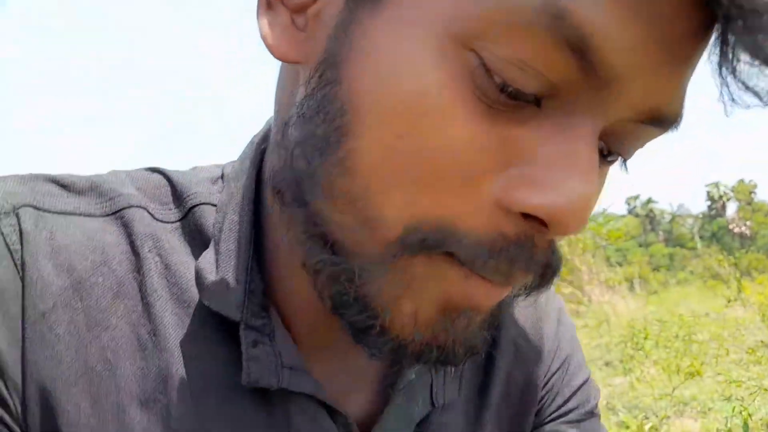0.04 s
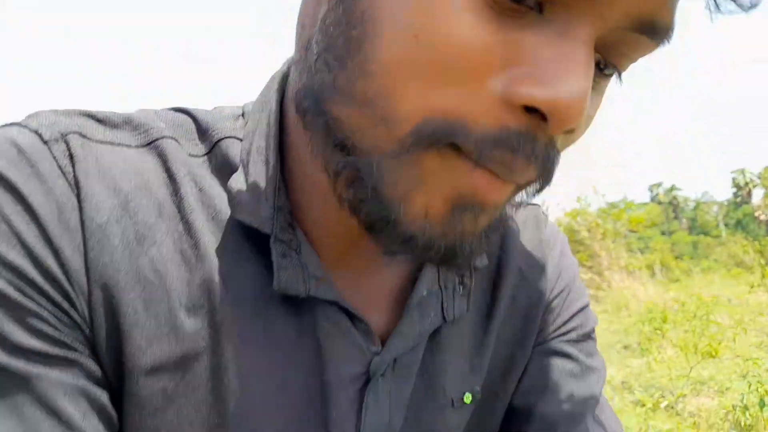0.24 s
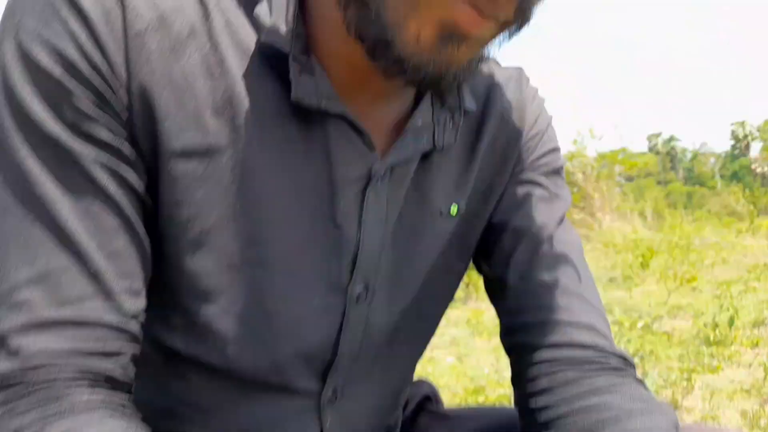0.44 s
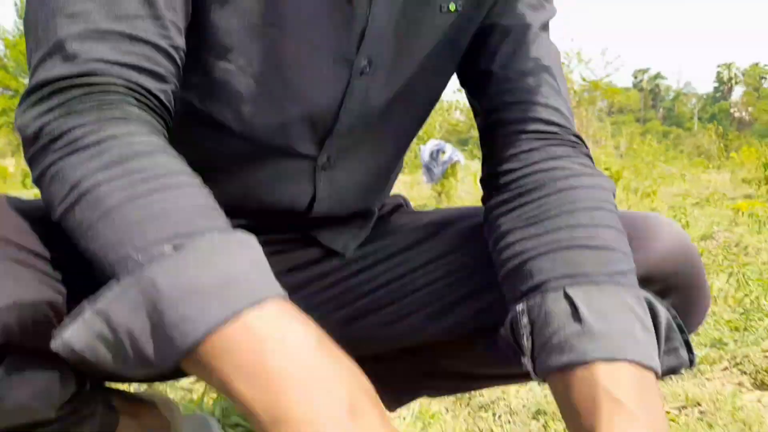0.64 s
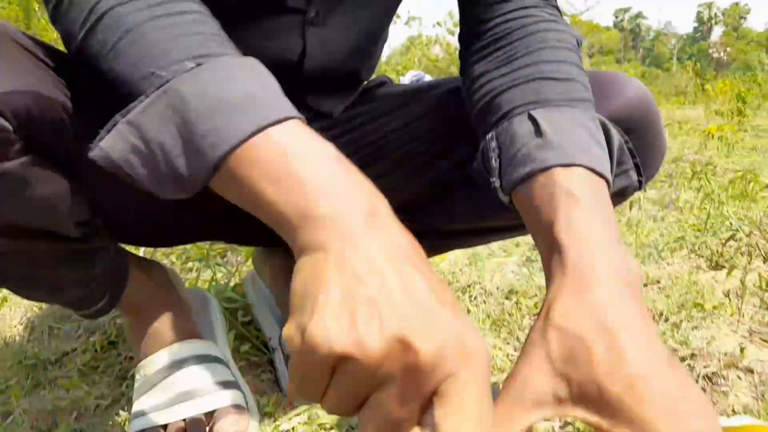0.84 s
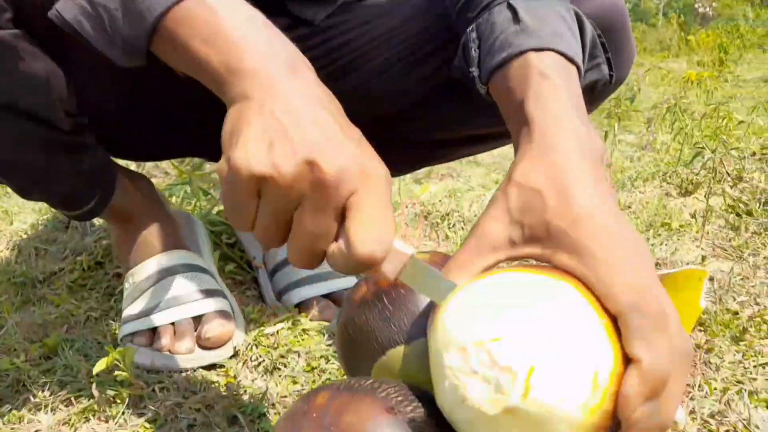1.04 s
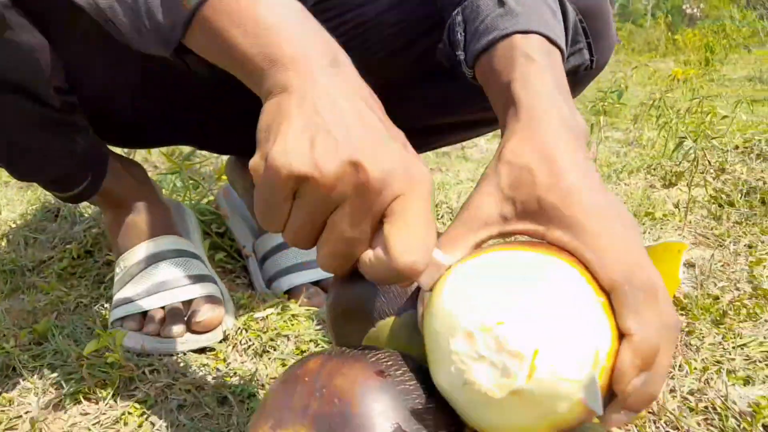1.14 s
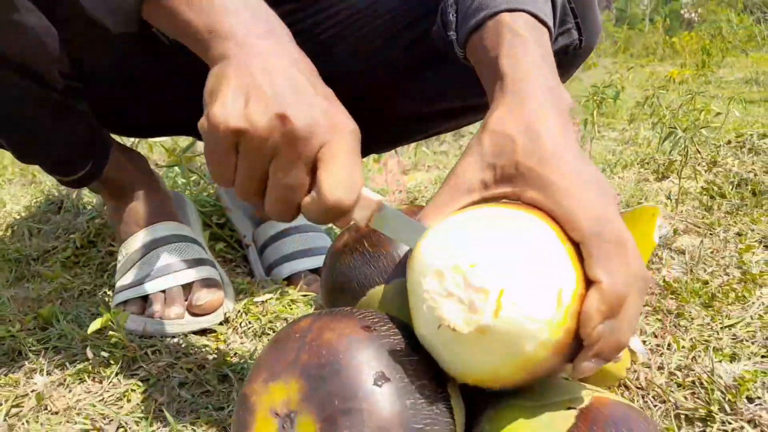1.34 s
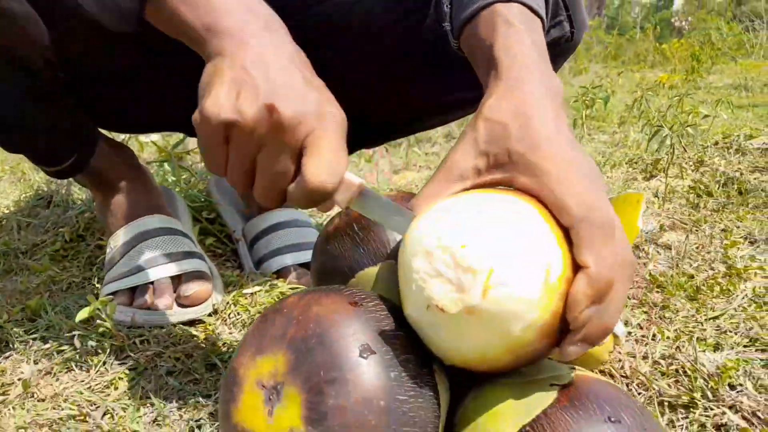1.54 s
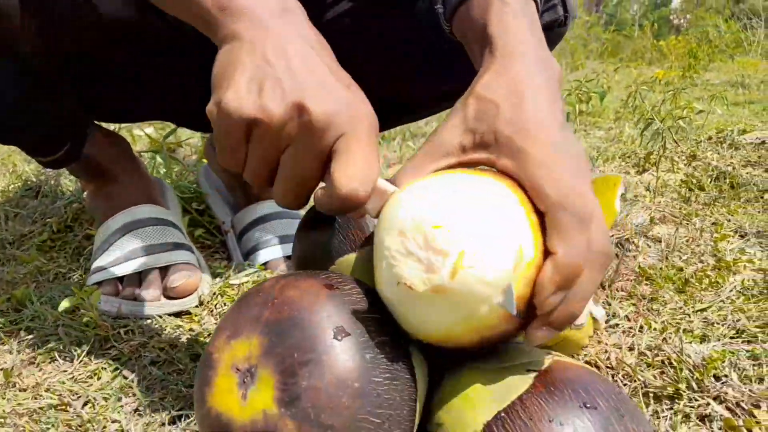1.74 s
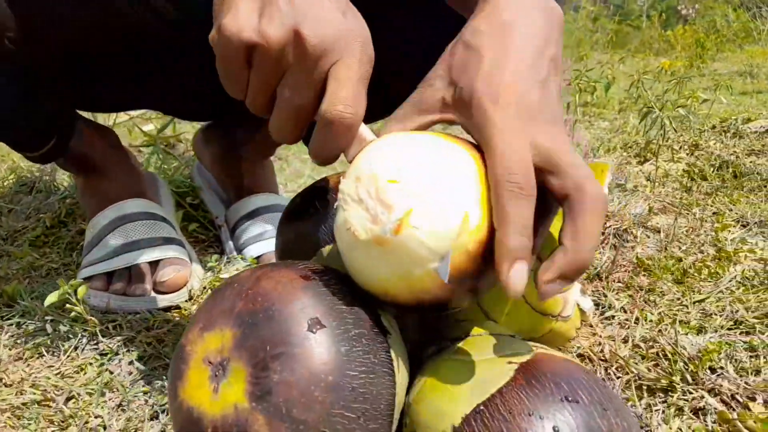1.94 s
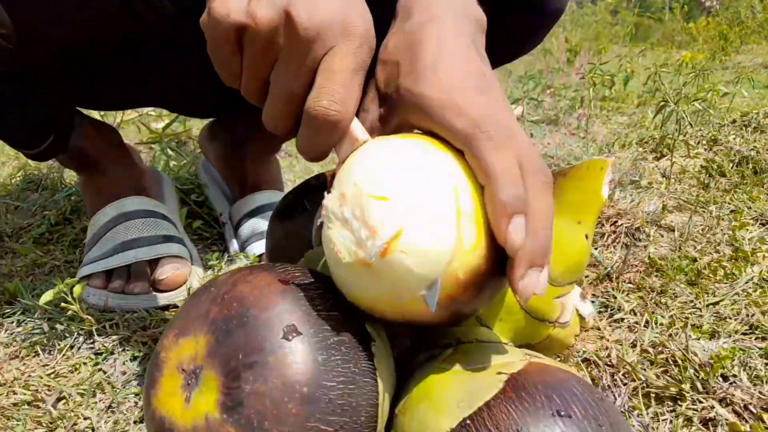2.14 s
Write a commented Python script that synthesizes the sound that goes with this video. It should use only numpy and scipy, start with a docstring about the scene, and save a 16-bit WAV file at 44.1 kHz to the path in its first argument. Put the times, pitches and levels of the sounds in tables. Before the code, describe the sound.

A small knife saws through fibrous palm fruit, close and dry, outdoors. Faint rasps start near 0.05 s, with a soft thump and dry tick at 0.2. From 0.4 to 1.7 s, fast uneven crunchy strokes tear fibres, with sharp snaps around 0.6, 0.95, 1.2 and 1.5. A quieter squeaky slide follows at 1.75-1.95, then a fainter one at 2.05-2.2, over light low breeze and faint hiss.

```python
"""A small knife saws through the fibrous flesh of a palm fruit in a field, over a light breeze and soft thumps.
Quick strokes come first: clumped grains of noise rasp like tearing fibres, coloured by the fruit's modes.
Among them thick fibres snap, each a short chord of decaying sines with a crumbly noise tail.
At the end the blade slides and twists twice, more gently, with narrow squeaks.
The two microphone ports of a hand-held phone hear it at different levels and phases."""
import sys
import numpy as np
from scipy import signal
from scipy.fft import rfft, irfft
from scipy.io import wavfile

SR = 44100
rng = np.random.default_rng(int(sys.argv[2]) if len(sys.argv) > 2 else 0)


def digitize_waveform(pressure):
    """Quantize a signal to 16-bit integers and store it at the path in sys.argv[1].

    Rows of a 2-D input are taken as channels; values are limited to [-1, 1].
    """
    field = np.atleast_2d(pressure).T
    bounded = np.clip(field, -1, 1)
    quanta = np.round(bounded * 32767).astype(np.int16)
    wavfile.write(sys.argv[1], SR, quanta)


N = 97020

# Modes the fruit rings with, before detuning: pitch_hz, relative level_db, shortest t60_s
FRUIT_MODES = [(650, -6, .02), (950, -6, .016), (1580, -2, .013), (2050, -1, .012), (2400, 1, .011),
               (2990, 2, .008), (3600, 2, .006), (4500, 3, .008), (5500, 1, .005), (6500, 0, .006)]


def amp(db):
    """Decibels to linear gain."""
    return 10 ** (np.asarray(db) / 20)


def rms_one(x):
    """Scale to an overall RMS of 1."""
    return x / np.sqrt(np.mean(x ** 2) + 1e-20)


def decay_per_sample(t60_s):
    """Factor that makes a sound fall 60 dB in t60_s."""
    return amp(-60 / (t60_s * SR))


def at_hz(points):
    """A table of (Hz, value) read at every frequency bin, along a log axis."""
    hz, value = np.transpose(points)
    bins_hz = np.arange(N // 2 + 1) * SR / N
    return np.interp(np.log(bins_hz + 1), np.log(hz + 1), value)


def colour(x, spectrum):
    """Filter by a drawn spectrum in dB."""
    return irfft(rfft(x) * amp(at_hz(spectrum)), N)


def band(x, low_hz, high_hz):
    """Keep one band of frequencies."""
    return signal.sosfilt(signal.butter(3, [low_hz, high_hz], "band", fs=SR, output="sos"), x)


def low_pass(x, hz):
    """Gentle second-order cut of the treble."""
    return signal.sosfilt(signal.butter(2, hz, fs=SR, output="sos"), x)


def high_pass(x, hz):
    """Gentle second-order cut of the bass."""
    return signal.sosfilt(signal.butter(2, hz, "high", fs=SR, output="sos"), x)


def drift(rate_hz):
    """Slow random wander of RMS 1, from noise smoothed by two equal poles."""
    r = np.exp(-2 * np.pi * rate_hz / SR)
    wander = signal.lfilter([1], [1, -2 * r, r * r], rng.standard_normal(N + SR))
    return rms_one(wander[SR:])  # the first second lets the filter settle


def ring(clicks, hz, t60_s):
    """Two-pole resonator: a unit click starts a decaying sine of initial height 1."""
    r, w = decay_per_sample(t60_s), 2 * np.pi * hz / SR
    return signal.lfilter([0, np.sin(w)], [1, -2 * r * np.cos(w), r * r], clicks + 1e-18)


def pair(shared, own, alike):
    """Two channels that share a fraction of their power."""
    return np.sqrt(alike) * shared + np.sqrt(1 - alike) * own


def follow(strokes):
    """Gain (zero between strokes) and the further columns of a list of strokes, sample by sample."""
    edge_s = .003  # a stroke fades in and out this fast
    t = np.arange(N) / SR
    on = 0
    for points in strokes:
        inside_s = np.minimum(t - points[0][0], points[-1][0] - t)
        on = on + np.clip(inside_s / edge_s + 1, 0, 1)
    rows = np.concatenate(strokes)
    columns = [np.interp(t, rows[:, 0], column) for column in rows[:, 1:].T]
    return np.minimum(on, 1), columns


def around(x, centre_hz, below_oct, above_oct, count):
    """Bands weighted about a moving centre, 6 dB down at below_oct and above_oct; summed gain power is 1."""
    patch_db, patches_hz = 2.5, 45  # each band flares on its own
    edges = np.geomspace(420, 7400, count + 1)
    band_hz = np.sqrt(edges[1:] * edges[:-1])[:, None]
    off_oct = np.log2(band_hz / centre_hz)
    width_oct = np.where(off_oct < 0, below_oct, above_oct)
    gains = amp(-6 * (off_oct / width_oct) ** 2) + 1e-9
    gains = gains / np.sqrt(np.sum(gains ** 2, axis=0))
    out = 0
    for gain, low_hz, high_hz in zip(gains, edges, edges[1:]):
        patchy = band(x, low_hz, high_hz) * amp(patch_db * drift(patches_hz))
        out = out + gain * rms_one(patchy)
    return out


def lead():
    """Phase lead of the left port by frequency; the right is left as it is."""
    # pitch_hz, lead_radians of the left port
    left_lead = [(0, 0), (600, -.7), (2500, -1.5), (3200, .2), (4500, -1.8), (16000, -2)]
    hz, radians = np.transpose(left_lead)
    bins_rad = np.interp(np.arange(N // 2 + 1) * SR / N, hz, radians)
    return np.exp(1j * np.array([[1], [0]]) * bins_rad)


def ports(x):
    """The two microphone ports differ in level and phase by frequency."""
    # pitch_hz, left_minus_right_db
    port_balance = [(60, -4.5), (110, -6.5), (200, -5), (380, -3.5), (700, -3.5), (1290, -6.5), (2380, -1),
                    (4400, -18.5), (8120, -3.5), (15000, 4)]
    side = np.array([[.5], [-.5]])  # half of the difference to each side
    spectrum = rfft(x * np.ones((2, 1)))
    return irfft(spectrum * amp(side * at_hz(port_balance)) * lead(), N)


def air():
    """Coloured noise: lumpy low wind on the ports over the faint hiss of the field."""
    # Colour of breeze and field: pitch_hz, relative level_db per Hz
    air_colour = [(18, -36), (30, -5), (221, 4), (600, -2.5), (913, -15.5), (1160, -27), (3580, -20),
                  (4530, -22), (4910, -15), (6550, -19), (8520, -25), (14400, -27), (16000, -37)]
    # Strength of the low wind before gusts and ports: time_s, level_db
    breeze = [(0.0, -58.5), (0.29, -50.5), (0.43, -54), (0.62, -51.5), (1.06, -51), (1.37, -50.5),
              (1.43, -49), (1.93, -54), (2.2, -53.5)]
    gust_db, gusts_hz, hiss_db = 1.5, 14, -53.5
    noise = rng.standard_normal((3, N))
    field = colour(pair(noise[0], noise[1:], alike=.5), air_colour)
    field = field / np.std(band(field, 40, 440))
    s, db = np.transpose(breeze)
    wind_db = np.interp(np.arange(N) / SR, s, db)
    gusts = amp(wind_db + gust_db * drift(gusts_hz))
    wind = gusts * low_pass(field, 500)
    hiss = amp(hiss_db) * high_pass(field, 600)
    return ports(wind + hiss)


def thumps():
    """Soft pushes of hand and fruit as short sine bursts, louder on the right."""
    # middle_s, level_db before panning, pitch_hz, half_length in cycles (to 1/e)
    pushes = [(0.206, -23, 220, 0.5), (.347, -34, 177, 1.27), (1.13, -39, 317, 1.5),
              (0.979, -37.5, 115, 0.55), (1.09, -38, 148, 0.71), (1.179, -41.5, 62.3, 0.39),
              (1.458, -34, 80, 0.32), (1.701, -25.5, 380, 0.34), (1.713, -31, 80, 0.23)]
    out = np.zeros((2, N))
    for middle_s, level_db, hz, half_length in pushes:
        cycles = (np.arange(N) / SR - middle_s) * hz
        swell = np.exp(-(cycles / half_length) ** 2)
        out += amp(level_db) * np.sin(2 * np.pi * cycles) * swell * amp([[-4], [3]])
    return out


def tap():
    """One dry tick at the right port: a click into a heavily damped resonator."""
    # start_s, level_db, pitch_hz, t60_s
    tick = (.2048, 1, 3500, .0016)
    s, level_db, hz, t60_s = tick
    click = 1. * (np.arange(N) == int(s * SR))
    out = np.zeros((2, N))
    out[1] = amp(level_db) * ring(click, hz, t60_s)
    return out


def snaps():
    """A crack rings the fruit's modes, louder and longer near its centre; a crumbly tail follows."""
    # Thick fibres that snap: start_s, level_db, centre_hz, treble_db (relative), centre_lift_db
    cracks = [(0.1, -34.5, 990, -24.5, 8), (0.263, -21.5, 1410, -3.5, 16), (0.282, -29, 1760, -25, 15),
              (0.314, -25.5, 5640, -8, 11), (0.3281, -16, 1350, -12.5, 9), (0.376, -23, 985, -9, 6.5),
              (0.457, -17, 2010, -10, 3.5), (0.521, -13.5, 6470, -36, 12), (0.579, -19, 970, -3, 0),
              (0.5831, -13.5, 2166, -13.5, 10), (0.6094, -6.5, 1480, -14, 0.5), (0.632, -27, 695, -35, 16),
              (0.635, -24.5, 1680, -25, 29), (0.65, -33.5, 640, -32, 12), (0.671, -26, 2020, -20, -4),
              (0.719, -22.5, 5430, -15, 22), (0.854, -16, 4500, -22, -12), (0.881, -21.5, 1190, -23, 0),
              (0.887, -16, 2110, -16, 12), (0.936, -23.5, 2230, -18, -3), (0.9434, -6.5, 1663, -22.5, 3),
              (0.974, -27.5, 720, -14, 6), (1.016, -17, 4960, -5, 13), (1.022, -14.5, 2200, -26, 14.5),
              (1.15, -16.5, 4760, -16, 6.5), (1.16, -12, 1730, -10.5, 5.5), (1.167, -19, 1850, -25, 4),
              (1.176, -22.5, 4500, -5.5, 7.5), (1.198, -23, 5230, -27, 13), (1.202, -21, 1630, -8.5, -8),
              (1.2152, -4.5, 2515, -29, 2.5), (1.23, -18, 1640, -37, 4), (1.24, -22.5, 4630, -14.5, -4),
              (1.405, -20, 5600, -25, 19), (1.43, -21, 4970, -18, 24), (1.452, -16.5, 3920, -22, 2),
              (1.4956, -6, 3220, -25.5, -1), (1.531, -23, 1810, -18, 19), (1.643, -23, 2860, -12, -2),
              (1.7, -16, 4180, -29, 2), (1.7047, -15.5, 3600, -21, 10), (1.733, -27.5, 2400, -28, 3)]
    # Brief treble tick of a snap: pitch_hz, relative level_db, shortest t60_s
    spark = [(9870, 0, .003), (11500, -4, .003), (13700, 0, .003)]
    # Where the modes sound: pitch_hz, left_minus_right_db
    mode_sides = [(700, -2.5), (2500, -8.5), (4500, -8), (9000, -6)]
    delay_s = .000872  # short fixed delay from start_s to the crack
    below_oct, above_oct = 1.15, 1.7  # modes fall 6 dB this far under and over the centre
    peak_oct, linger = .24, .6  # width of the favoured modes; how much longer they ring
    detune, mode_spread_db = .03, 2  # each snap holds the fruit a little differently
    spark_db, after_db, after_t60_s = 14, -11.5, .017

    t = np.arange(2000) / SR
    hz, level_db, t60_s = np.transpose(FRUIT_MODES + spark)[:, :, None]
    index = np.arange(len(hz))[:, None]
    is_body, sign = index < len(FRUIT_MODES), (-1) ** index
    side_hz, side_db = np.transpose(mode_sides)
    pan_db = np.interp(np.log(hz), np.log(side_hz), side_db)

    out, tail = np.zeros((2, N + SR)), np.zeros((2, N))
    for s, snap_db, centre_hz, treble_db, lift_db in cracks:
        level_draw, pitch_draw, pan_draw = rng.standard_normal((3, len(hz), 1))
        off_oct = np.log2(hz / centre_hz)
        near = np.exp(-(off_oct / peak_oct) ** 2)
        width_oct = np.where(off_oct < 0, below_oct, above_oct)
        body_db = lift_db * near - 6 * (off_oct / width_oct) ** 2
        tilt_db = np.where(is_body, body_db, treble_db + spark_db)
        # modes near the centre are pulled onto it
        tuned_hz = hz * (1 + detune * pitch_draw) * 2 ** (-off_oct * near)
        decay_db = -60 * t / (t60_s * (1 + linger * near))
        heights = amp(level_db + tilt_db + mode_spread_db * level_draw + decay_db)
        modes = sign * heights * np.sin(2 * np.pi * tuned_hz * t)
        modes = amp(snap_db) * modes / np.max(np.abs(np.sum(modes, axis=0)))
        half_pan = amp((pan_db + mode_spread_db * pan_draw) / 2)
        at = int((s + delay_s) * SR)
        out[:, at:at + len(t)] += [np.sum(modes * half_pan, axis=0), np.sum(modes / half_pan, axis=0)]
        tail[:, at] = amp(snap_db + after_db + np.array([-4, 3]))  # louder on the right

    crumbs = rms_one(band(rng.standard_normal((2, N)), 644, 6150))
    tail_gain = signal.lfilter([1], [1, -decay_per_sample(after_t60_s)], tail + 1e-18)
    out = high_pass(out[:, :N] + crumbs * tail_gain, 480)
    return irfft(rfft(out) * lead(), N)


def fibre_grains():
    """Three streams of tearing fibre: random clicks on hiss, clumped and burst together."""
    fibres_per_s, fibre_spread_db, hiss_db = 4000, 4.5, -1
    clump_db, clumps_hz = 2, 220
    pops_per_s, pop_db, pop_t60_s = 130, 5.5, .003  # coarser fibres give way in short bursts
    sizes = amp(fibre_spread_db * np.minimum(rng.exponential(1, (3, N)), 5))
    sizes = sizes * rng.choice([-1, 1], (3, N))
    clicks = rms_one(sizes * (rng.random((3, N)) < fibres_per_s / SR))
    grains = clicks + amp(hiss_db) * rng.standard_normal((3, N))
    pops = (rng.random(N) < pops_per_s / SR) * amp(pop_db) * rng.random(N)
    bursts = 1 + signal.lfilter([1], [1, -decay_per_sample(pop_t60_s)], pops + 1e-18)
    return grains * bursts * amp(clump_db * drift(clumps_hz))


def rasp():
    """Fibre grains excite the fruit's modes; a moving body band, a treble band and a squeak follow the blade."""
    # Sawing strokes: time_s, body level_db, centre_hz, treble level_db (before drag and ports)
    saw_strokes = [
        [(0.043, -79, 2940, -86.5), (0.05, -46.5, 4670, -47), (0.078, -52, 4170, -57),
         (0.112, -54.5, 1850, -59)],
        [(0.225, -49.5, 4040, -50), (0.235, -37.5, 4300, -39), (0.255, -42.5, 4300, -50),
         (0.298, -45, 2930, -52)],
        [(0.308, -57, 4140, -59), (0.316, -55, 5250, -54), (0.345, -42.5, 2300, -52)],
        [(0.372, -58, 3010, -53), (0.382, -50, 2010, -51), (0.4, -54, 4970, -41)],
        [(0.411, -38, 3830, -50), (0.416, -35, 3370, -34), (0.435, -40.5, 3800, -39.5),
         (0.455, -38.5, 3420, -47), (0.483, -47.5, 3600, -51)],
        [(0.518, -47, 3500, -53), (0.522, -33, 6400, -34), (0.555, -25.5, 5700, -31),
         (0.566, -44.5, 3920, -46.5), (0.598, -37, 2130, -50)],
        [(0.62, -42, 1600, -59), (0.637, -52, 1320, -55), (0.65, -55, 1130, -65), (0.685, -50.5, 3280, -57)],
        [(0.708, -42.5, 4140, -58), (0.717, -54, 4760, -36), (0.721, -34, 4740, -30), (0.765, -34, 3200, -37),
         (0.78, -45, 3320, -39)],
        [(0.818, -53, 3780, -56), (0.829, -29, 4100, -32), (0.858, -24, 4670, -30.5), (0.869, -38.5, 3430, -46),
         (0.9, -43, 2790, -53)],
        [(0.95, -57, 2300, -52), (0.975, -52, 1920, -67), (0.995, -47.5, 3600, -45), (1.012, -46, 3830, -56)],
        [(1.014, -47, 3700, -35), (1.02, -34, 3340, -26.5), (1.042, -35.5, 3600, -36.5),
         (1.068, -43.5, 3740, -44.5)],
        [(1.11, -51, 3050, -51), (1.113, -36, 5000, -42), (1.135, -25.5, 3740, -29.5),
         (1.15, -33.5, 3720, -39.5), (1.196, -43, 4150, -48)],
        [(1.222, -45.5, 2200, -75), (1.235, -32, 1960, -65), (1.25, -46, 3000, -51)],
        [(1.284, -49, 3120, -54), (1.3, -33.5, 4400, -38), (1.306, -35.5, 4100, -38.5), (1.355, -35, 4140, -38),
         (1.372, -47, 3390, -50)],
        [(1.39, -42, 2400, -53), (1.396, -34.5, 3700, -42.5), (1.425, -26.5, 3530, -29.5),
         (1.44, -35, 3460, -39), (1.455, -38, 3450, -43), (1.475, -42.5, 3090, -50)],
        [(1.502, -43.5, 2410, -46), (1.53, -41, 2700, -45), (1.553, -44.5, 3470, -44)],
        [(1.565, -34.5, 4160, -46), (1.575, -40.5, 4200, -35.5), (1.6, -32, 4200, -50.5),
         (1.618, -45, 3100, -42)],
        [(1.64, -48.5, 3350, -51), (1.65, -36, 3110, -43), (1.658, -27.5, 4040, -31.5),
         (1.688, -26, 3340, -29.5), (1.696, -42, 3750, -43), (1.716, -36.5, 2820, -45)],
    ]
    # The blade slides and twists more gently at the end, same columns
    slides = [
        [(1.755, -59, 2880, -53.5), (1.765, -57, 1950, -60), (1.79, -52.5, 3250, -62), (1.815, -48, 3560, -42),
         (1.85, -44.5, 2700, -58), (1.888, -48, 2720, -53), (1.91, -51.5, 2740, -68), (1.945, -56.5, 3640, -53)],
        [(2.04, -59, 4200, -53), (2.075, -57, 4190, -63), (2.095, -63, 2700, -53), (2.115, -58, 2900, -56),
         (2.14, -56.5, 3930, -56), (2.2, -60, 2830, -68)],
    ]
    # Narrow squeaks in the sliding: time_s, level_db before ports, pitch_hz
    squeaks = [
        [(1.756, -62, 1700), (1.763, -43, 1730), (1.778, -52, 2400), (1.79, -46, 3530), (1.815, -44.5, 4430),
         (1.825, -57, 4430)],
        [(1.82, -51, 2240), (1.85, -47.5, 2290), (1.888, -32, 2270), (1.91, -50.5, 2040), (1.94, -60, 1930)],
        [(2.085, -61, 2000), (2.098, -50.5, 2160), (2.12, -50, 2180), (2.14, -62, 1980)],
    ]
    # Colour of the treble rasp: pitch_hz, relative level_db per Hz
    treble_colour = [(4470, -74), (7600, 4.5), (7970, -6), (9830, 3.5), (12000, -1.5), (13600, 4.5),
                     (15600, -3.5), (16400, -2)]
    body_db = 4.5  # the fruit's modes stand out of the rasp
    rest_db = -9.5  # between strokes the blade still drags faintly
    stroke_below_oct, slide_below_oct, above_oct = 1.65, 1, 3.6  # slides carry less bass
    squeak_oct = .26

    grains = fibre_grains()
    torn = pair(grains[0], grains[1:], alike=.5)
    fruit = 0
    for hz, _, t60_s in FRUIT_MODES:
        unit_gain = np.log(1000) / (t60_s * SR) * 2  # about 1 at the resonance
        fruit = fruit + ring(torn, hz, t60_s) * unit_gain
    torn = torn + amp(body_db) * fruit

    on, (level_db, centre_hz, treble_db) = follow(saw_strokes + slides)
    sawing = np.arange(N) / SR < slides[0][0][0]
    below_oct = np.where(sawing, stroke_below_oct, slide_below_oct)
    body = amp(level_db) * around(torn, centre_hz, below_oct, above_oct, count=14)
    treble = colour(pair(grains[0], grains[1:], alike=.13), treble_colour)
    treble = amp(treble_db) * rms_one(band(treble, 7700, 16600))
    out = np.maximum(on, amp(rest_db)) * (body + treble)

    on, (level_db, pitch_hz) = follow(squeaks)
    squeak = on * amp(level_db) * around(torn, pitch_hz, squeak_oct, squeak_oct, count=16)
    return ports(out + squeak)


def scene():
    """Breeze, thumps, tick, snaps and rasp together."""
    return air() + thumps() + tap() + snaps() + rasp()


def record(dry):
    """Rumble below 38 Hz and everything above 16.6 kHz are cut."""
    x = high_pass(dry, 38)
    top_cut = signal.cheby2(18, 80, 16600, fs=SR, output="sos")
    return np.clip(signal.sosfilt(top_cut, x), -1, 1)


dry = scene()
out = record(dry)
digitize_waveform(out)
```